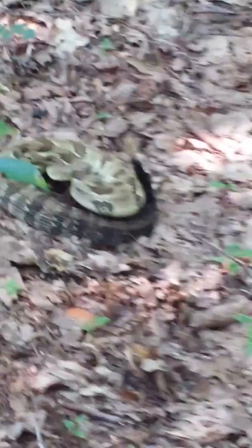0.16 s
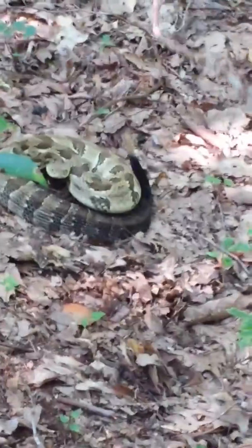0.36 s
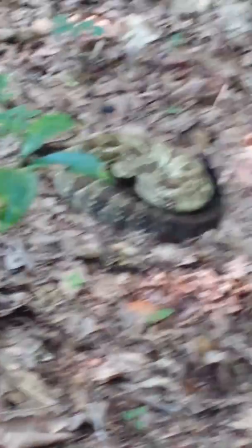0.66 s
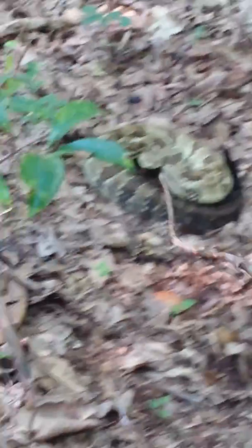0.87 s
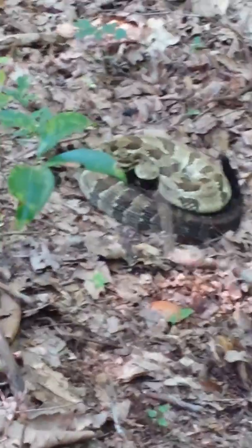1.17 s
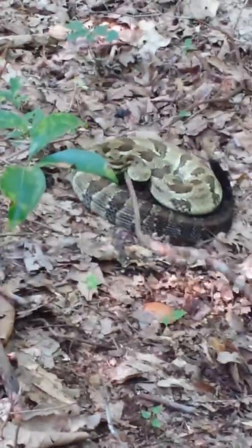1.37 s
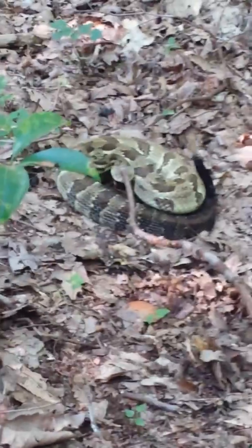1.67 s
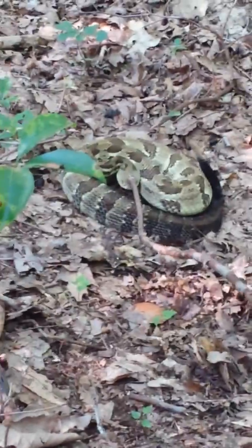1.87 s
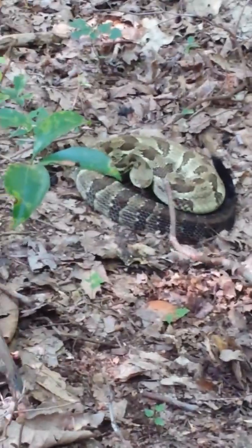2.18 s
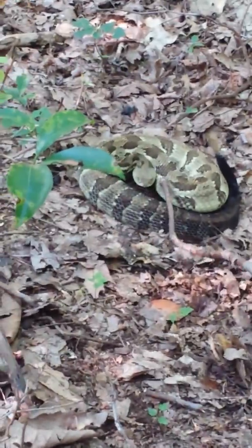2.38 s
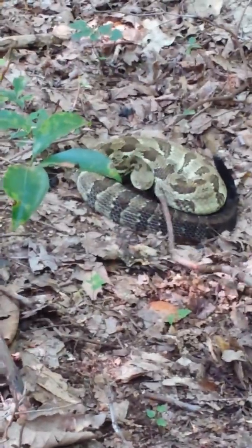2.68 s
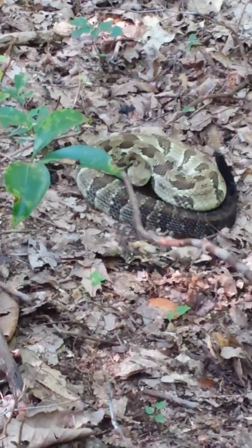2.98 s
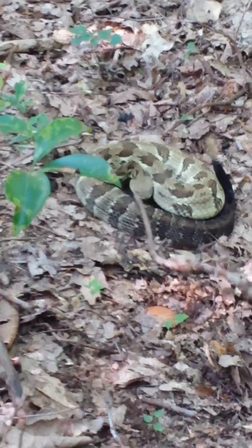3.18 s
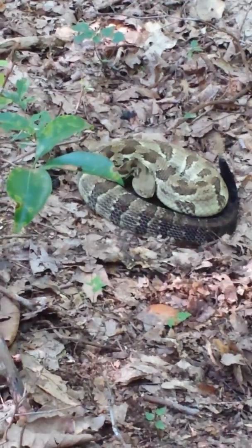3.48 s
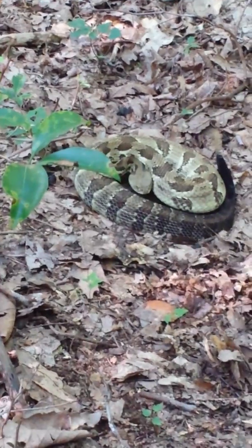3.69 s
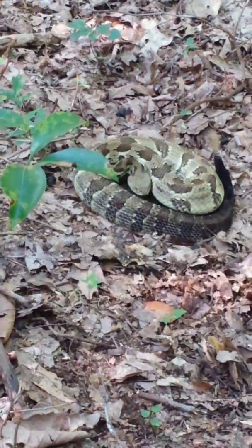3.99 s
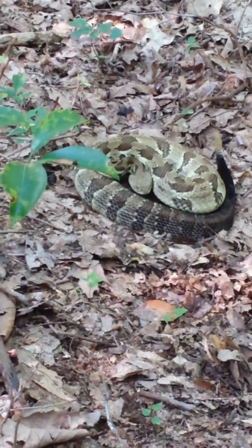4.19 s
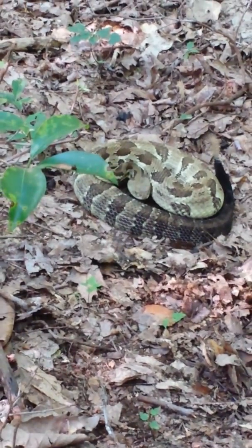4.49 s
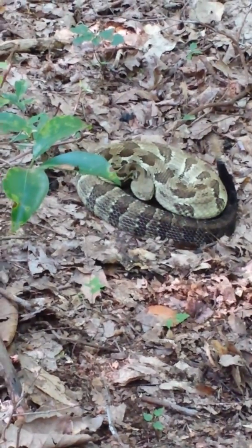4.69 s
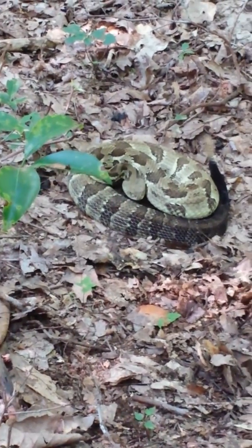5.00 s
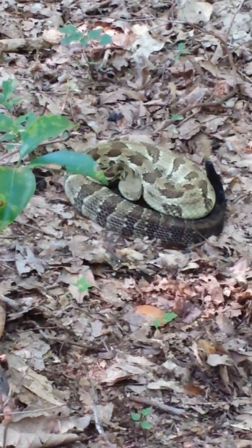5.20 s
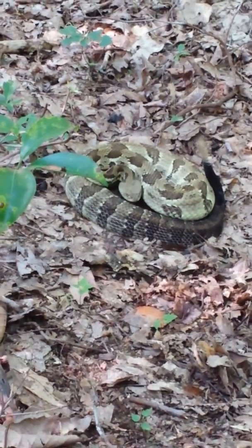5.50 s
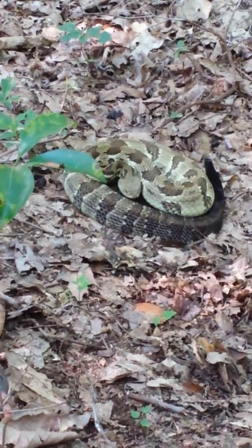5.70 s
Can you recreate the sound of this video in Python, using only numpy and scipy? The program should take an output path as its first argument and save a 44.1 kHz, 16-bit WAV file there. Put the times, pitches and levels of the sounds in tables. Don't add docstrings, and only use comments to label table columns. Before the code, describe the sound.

A coiled rattlesnake buzzes steadily, close to a hand-held camera in woodland. The rattle is a dense, bright, dry sizzle over faint low air. Past the middle, soft knocks and leaf rustling lead to one sharp woody tap; the buzz dips in level, then recovers as a stick settles with knocks, crackles and a late flurry of leaf snaps.

```python
import sys
import numpy as np
from scipy import signal
from scipy.fft import rfft, irfft
from scipy.io import wavfile

SR = 44100
rng = np.random.default_rng(int(sys.argv[2]) if len(sys.argv) > 2 else 0)


def invert_db(level):
    return 10 ** (np.asarray(level, dtype=float) / 20)


def dump_mix(stems):
    frames = np.atleast_2d(stems).T
    limited = np.clip(frames, -1, 1)
    pcm = np.round(limited * 32767).astype(np.int16)
    wavfile.write(sys.argv[1], SR, pcm)


N = 257984
CRACK_S = 3.5827


def evened(x):
    return x / np.sqrt(np.mean(x ** 2) + 1e-20)


def curve(rows):
    s, *columns = np.transpose(rows)
    return [np.interp(np.arange(N) / SR, s, c) for c in columns]


def colour(x, hz, db, size=2048):
    bins = abs(np.fft.fftfreq(size, 1 / SR))
    log_gain = np.log(invert_db(np.interp(np.log(bins + 1), np.log(hz), db)))
    taps = np.fft.ifft(np.exp(np.conj(signal.hilbert(log_gain)))).real
    return signal.oaconvolve(x, taps[:size // 2])[:N]


def drift(hz):
    spectrum = rfft(rng.standard_normal(N))
    return evened(irfft(spectrum / (1 + (np.fft.rfftfreq(N, 1 / SR) / hz) ** 2), N))


def clicks(per_s, spread_db):
    luck, size, sign = rng.random(N), rng.exponential(1, N), rng.choice([-1., 1.], N)
    return (luck < per_s / SR) * invert_db(spread_db * np.minimum(size, 4)) * sign


def swell(s, rise, hold, fall):
    t = np.arange(N) / SR - s
    return np.clip(np.minimum(t / rise, (rise + hold + fall - t) / fall), 0, 1)


def add(mix, s, sound):
    part = mix[:, round(s * SR):][:, :sound.shape[1]]
    part += sound[:, :part.shape[1]]


def shake(per_s):
    turn = 2 * np.pi * np.cumsum(per_s * (1 + .008 * drift(hz=6))) / SR
    whip_db = 1.4 * np.cos(turn) + .8 * np.cos(2 * turn + .8)
    bunch_db = (1.7 + .9 * drift(hz=3)) * np.cos(4 * turn + .3 * drift(hz=30))
    return invert_db(whip_db + bunch_db)


def segment_clacks(swing):
    segments_hz = (2558, 4100, 5930, 9660, 14750)
    together = .16 * clicks(per_s=500, spread_db=2.3)
    clacks = 0
    for f in segments_hz:
        struck = together + clicks(per_s=4500, spread_db=1.9)
        struck = swing * invert_db(.7 * drift(hz=1.2)) * struck
        clacks = clacks + colour(struck, [f / 2, f, f * 2], [-22, 0, -22], size=256)
    return evened(clacks)


def add_rings(x):
    # [f/Hz, width/Hz, level/dB]
    narrow_rings = [(3310, 220, 0.5), (3880, 170, -11), (4457, 82, -2), (4850, 75, -1), (5284, 180, -2),
                    (5430, 160, 0), (5828, 40, -2.5), (5830, 120, -5.5), (6160, 46, -4), (6140, 90, 0),
                    (6780, 110, -5), (7180, 150, -6.5), (7500, 180, -6.5), (8740, 97, -2)]
    rings = [invert_db(db) * signal.lfilter(*signal.iirpeak(hz, hz / width, fs=SR), x)
             for hz, width, db in narrow_rings]
    return x + sum(rings)


def rattle():
    # [t/s, effort/dB, shakes per second/Hz]
    tail = [(0.0, -29.5, 51.6), (0.07, -32, 51.5), (0.2, -29.5, 51.2), (0.3, -31, 51.1),
            (1.02, -32.5, 48.2), (1.3, -33.3, 48.2), (1.53, -32.5, 48.2), (1.97, -32, 52.1),
            (2.18, -30.8, 52.2), (2.67, -31.9, 49.7), (2.83, -32, 51.8), (3.18, -30.5, 52.7),
            (3.34, -30.5, 55.0), (3.63, -32, 51.7), (3.81, -32, 50.7), (4.75, -31.5, 50.3),
            (5.6, -31, 49.6), (5.85, -31.5, 47.5)]
    # [f/Hz, left level/dB, right level/dB]
    ports = [(1500, -33.6, -51.5), (2200, -25.4, -30.1), (3200, -13.1, -14.2), (4300, -9.5, -10.4),
             (5000, -4.8, -10.0), (5450, -0.1, -9.0), (6100, -1.6, -3.6), (7000, -9.0, -2.6),
             (7800, -15.7, -8.3), (9000, -23.4, -16.0), (10500, -27.6, -16.7), (12000, -22.1, -18.2),
             (13500, -16.3, -14.2), (14400, -19.2, -13.3)]
    trim_db = np.array([2.8, -0.05, 2.56, -0.5, -1.24, -0.7, -4.06, -1.2, 1.03, 0.7, -2.0, -1.5, 0.7, 1.3, 1.5, 1.0])
    # [f/Hz, level against the direct clack/dB]
    scatter = [(1800, 0), (2900, -9), (4500, -4), (6500, -5), (9500, 3), (13500, -1)]
    # [f/Hz, phase/rad]
    lead = [(0, 0), (1980, -0.0), (2500, -0.4), (3010, -0.0), (3530, -0.6), (4570, -0.7), (5000, -0.5),
            (6030, -2.6), (7840, -1.8), (10200, -1.8), (10700, -1.1), (12900, -1.7), (14400, -2.8),
            (14900, -3.0)]

    effort_db, per_s = curve(tail)
    clacks = segment_clacks(shake(per_s))
    fading = invert_db(-60 * np.arange(1000) / SR / 0.11) ** 2
    glow = evened(np.sqrt(abs(signal.oaconvolve(clacks ** 2, fading)[:N])))

    hz, left_db, right_db = np.transpose(ports)
    port_hz = np.r_[300, hz, 15500]
    port_db = np.r_[left_db[0] - 25, left_db, left_db[-1]] + trim_db
    heard = []
    for _ in range(2):
        scattered = colour(glow * rng.standard_normal(N), *np.transpose(scatter))
        heard.append(colour(add_rings(clacks) + scattered, port_hz, port_db))
    left, right = heard

    bins = np.fft.rfftfreq(N, 1 / SR)
    balance = invert_db(np.interp(np.log(bins + 1), np.log(hz), right_db - left_db + 0.41))
    cavity = balance * np.exp(-1j * np.interp(bins, *np.transpose(lead)))
    pair = evened(np.array([left, irfft(rfft(right) * cavity, N)]))
    return invert_db(effort_db + 4.0 + .4 * drift(hz=9)) * pair


def air():
    # [f/Hz, level/dB]
    hush = [(25, -52), (45, -60), (90, -39.5), (170, -42), (260, -48), (600, -49.5), (800, -52),
            (1050, -47), (1350, -52), (1650, -42.5), (1850, -50), (2100, -44), (3000, -54), (15000, -70)]
    shared, left, right = rng.standard_normal((3, N))
    pair = np.array([colour(.45 * shared + .89 * own, *np.transpose(hush), size=8192) for own in (left, right)])
    deep, low = (signal.filtfilt(*signal.butter(2, hz, fs=SR), pair) for hz in (115, 600))
    lumps = deep * invert_db(3.5 * drift(hz=4) - 1.5) + (low - deep) * invert_db(2.8 * drift(hz=7) - .8)
    return (pair - low + lumps) * invert_db(np.array([[0], [-2]]))


def drone():
    hum = signal.lfilter(*signal.butter(2, [500, 680], "band", fs=SR), rng.standard_normal(N))
    passing = swell(1.39, rise=.08, hold=.13, fall=.13)
    return invert_db(-59.5 + np.array([[0], [-5]])) * passing * evened(hum)


def leaves():
    # [f/Hz, level/dB]
    litter = [(120, -22), (300, 0), (600, -3.5), (1200, 1.5), (2500, 7.5), (6000, -4.5), (15000, -20)]
    # [start t/s, length/s, level/dB, brightness/dB: lowers the dull part by it, lifts the
    stirs = [(3.459, 0.081, -52.5, -2), (3.576, .055, -50.5, 0.5), (3.667, 0.063, -59, 6.5),
             (3.714, 0.099, -67, 7.5), (3.809, 0.61, -59.5, -5.5), (4.02, 0.042, -48, -1),
             (4.284, .12, -67.5, 4.5), (4.395, 0.17, -49.5, 3.5), (4.537, 0.086, -57.5, -4.5),
             (4.762, 0.27, -67.5, -5.5), (5.494, .15, -69, 8), (5.775, 0.13, -63.5, -3.5)]
    rise_s, fall_s = .015, .02

    shared = evened(clicks(per_s=700, spread_db=3.5)) + .5 * rng.standard_normal(N)
    pair = [colour(shared + 0.9 * rng.standard_normal(N), *np.transpose(litter)) for _ in range(2)]
    pair = evened(np.array(pair))
    dull = signal.lfilter(*signal.butter(2, 800, fs=SR), pair)
    low, high = evened(dull), evened(pair - dull)

    rustle = 0
    for s, length, level_db, tilt_db in stirs:
        stir = swell(s, rise_s, max(length - rise_s - fall_s, 0), fall_s) ** 2
        rustle = rustle + invert_db(level_db) * stir * (low * invert_db(-tilt_db) + high * invert_db(2 * tilt_db))
    return invert_db(2.18 * drift(hz=32.5) + np.array([[.4], [-.4]])) * rustle


def knocks(out, t):
    # [t/s, peak level/dB, f/Hz, left minus right/dB, t60/s]
    knock_list = [(3.478, -34.5, 283, 7.5, 0.026), (3.503, -33.5, 184, 0, 0.053),
                  (3.594, -35.5, 553, 3, 0.035), (3.613, -40.5, 1080, 5.5, 0.052),
                  (3.679, -33, 1344, -3.5, 0.031), (4.026, -40, 1168, 4, 0.08), (4.414, -34, 299, -2, 0.04),
                  (4.523, -38, 338, 10, 0.053), (4.551, -36, 156, 1, 0.076), (4.78, -43.5, 305, 0.5, 0.042),
                  (4.882, -45.5, 131, 2, 0.091), (4.95, -49.5, 325, 2, 0.043), (5.04, -44.5, 127, 0, 0.086),
                  (5.159, -47.5, 142, 3, 0.09), (5.66, -53, 180.6, -2, 0.19), (5.82, -49, 300, -0.5, 0.076)]
    for s, db, hz, pan_db, t60 in knock_list:
        band = signal.butter(2, [hz * .6, hz * 1.7], "band", fs=SR)
        puff = evened(signal.lfilter(*band, rng.standard_normal(len(t))))
        ring = .9 * np.sin(2 * np.pi * hz * t) + .45 * puff
        ring = ring * invert_db(-60 * t / t60) * np.minimum(t * hz / 1.2, 1)
        add(out, s, invert_db(db + np.array([[.5], [-.5]]) * pan_db) * ring)


def crack(out, t):
    # [f/Hz, left level/dB, right level/dB, t60/s]
    modes = [(543, -23, -38, 0.0083), (1000, -23, -36, .01), (1860, -25.5, -40.5, 0.014),
             (4200, -23, -23, 0.0063), (7770, -19, -11, 0.008), (9240, -30, -9, 0.0034),
             (11100, -26, -11, 0.006), (12200, -28, -7, 0.0042), (14700, -10, -24, 0.0036)]
    onset = np.minimum(t / .00025, 1)
    for hz, left_db, right_db, t60 in modes:
        fade = invert_db(np.array([[left_db], [right_db]]) + .5 - 60 * t / t60)
        add(out, CRACK_S, fade * onset * np.sin(2 * np.pi * (hz * t + rng.random())))


def snaps(out, t):
    # [t/s, peak level/dB, lowest f/Hz]
    snap_list = [
        (4.389, -32, 1450),
        (4.49, -26.5, 1490),
        (5.528, -23, 1440),
        (5.55, -27, 2020),
        (5.578, -24.5, 1500),
        (5.596, -25, 2220),
        (5.609, -23, 1500),
        (5.625, -24, 2430),
    ]
    for s, db, low_hz in snap_list:
        burst = rng.standard_normal(len(t)) * invert_db(db - 60 * t / 0.0091 + np.array([[-4.5], [0]]))
        add(out, s, signal.lfilter(*signal.butter(4, low_hz, "high", fs=SR), burst))


def stick():
    out, t = np.zeros((2, N)), np.arange(3000) / SR
    knocks(out, t)
    crack(out, t)
    snaps(out, t)
    return out


def scene():
    return rattle() + air() + drone() + leaves() + stick()


def gain_control():
    before_db, after_db, duck_db, sag_db = 2.5, 1.5, -12.5, -5
    sag_fall_s = 0.33
    duck = swell(CRACK_S - .019, rise=.006, hold=.0085, fall=.0045)
    sag = swell(CRACK_S, sag_fall_s, hold=0.44, fall=0.29)
    settled = swell(CRACK_S, sag_fall_s, hold=N / SR, fall=1)
    return invert_db(before_db + (after_db - before_db) * settled + duck_db * duck + sag_db * sag)


def coarse(x, level, start=652, size=1024, count=128):
    # [f/Hz, level/dB]
    faint_floor = [(20, -44), (150, -40), (400, -39), (1000, -39), (1650, -39), (2000, -38), (2700, -39)]
    n, k = np.arange(2 * size)[:, None], np.arange(count)
    window = signal.windows.kaiser_bessel_derived(2 * size, 4 * np.pi)[:, None]
    basis = window * np.sqrt(2 / size) * np.cos(np.pi / size * (n + .5 + size / 2) * (k + .5))
    wide = np.pad(x, ((0, 0), (2 * size - start, 3 * size)))
    at = np.arange(0, wide.shape[1] - 2 * size, size)
    weights = wide[:, at[:, None] + n.T] @ basis

    groups = weights.reshape(2, len(at), -1, 4)
    peak = abs(groups).max(3, keepdims=True)
    faint_db = np.interp(k[2::4] * SR / 2 / size, *np.transpose(faint_floor))[:, None]
    faint_db = faint_db + np.array([0, 3]).reshape(2, 1, 1, 1)
    level_here = level[np.clip(at + start - size, 0, N - 1), None, None]
    faint = invert_db(faint_db + rng.uniform(-2, 2, peak.shape)) * level_here
    step = faint * rng.uniform(.3, 1.2, peak.shape)
    kept = np.sign(groups) * np.floor(abs(groups) / step + .4) * step * (peak > faint)

    change = (kept.reshape(weights.shape) - weights) @ basis.T
    halves = change[:, 1:, :size] + change[:, :-1, size:]
    return x + halves.reshape(2, -1)[:, size - start:][:, :N]


def roll_off(x):
    return signal.sosfilt(signal.butter(12, 15370, fs=SR, output="sos"), x)


def record(dry):
    gain, ceiling = gain_control(), .58
    edge = signal.firwin(511, 14520, window=("kaiser", 9), fs=SR)
    limited = signal.oaconvolve(dry * gain, edge[None], "same")
    limited = limited / (1 + (limited / ceiling) ** 6) ** (1 / 6)
    care = 1 - .75 * (abs(np.arange(N) / SR - CRACK_S) < .016)
    mix = coarse(limited - .0005, care * gain ** 0.84)
    return roll_off(mix)


dry = scene()
out = record(dry)
dump_mix(out)
```